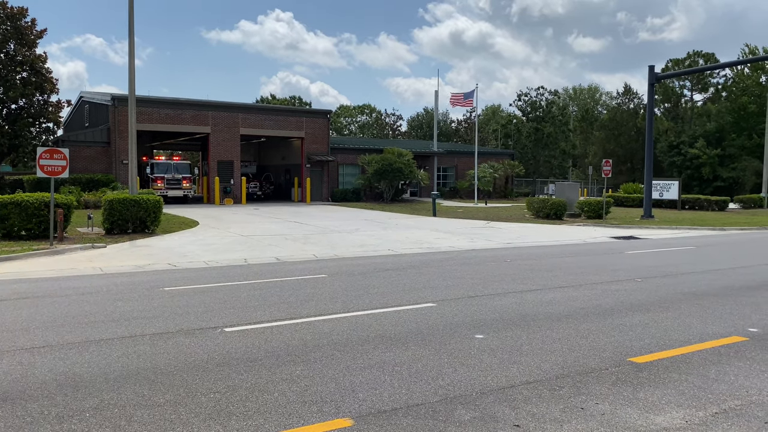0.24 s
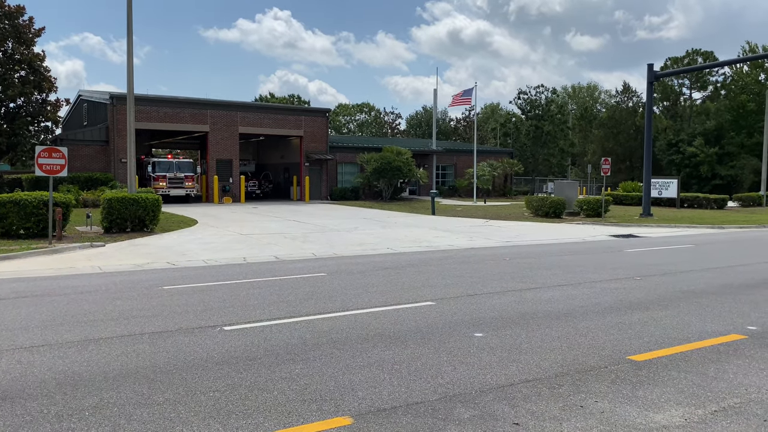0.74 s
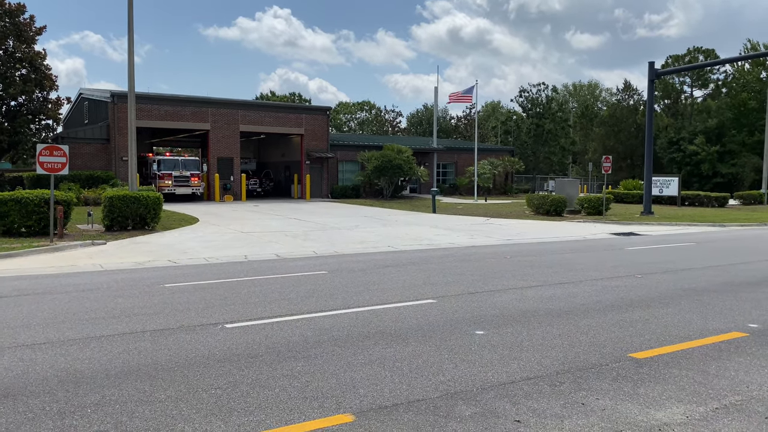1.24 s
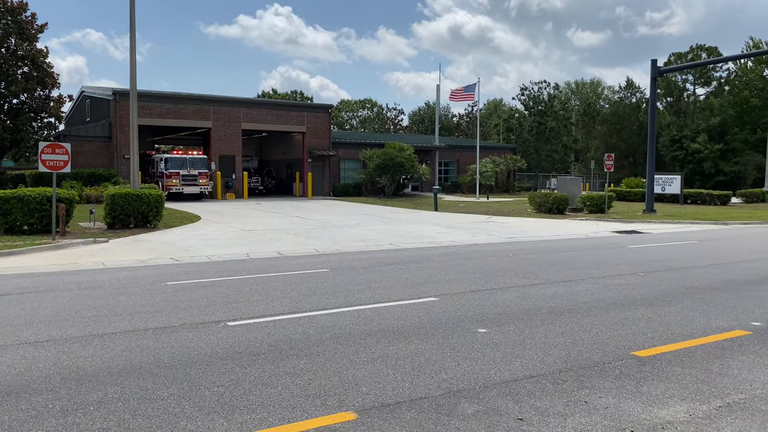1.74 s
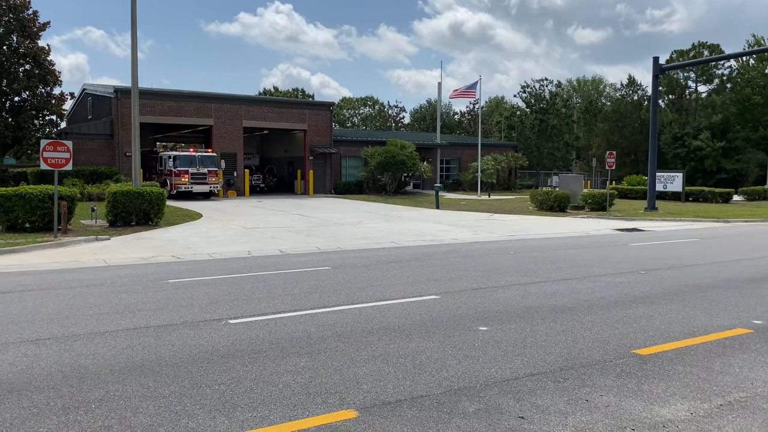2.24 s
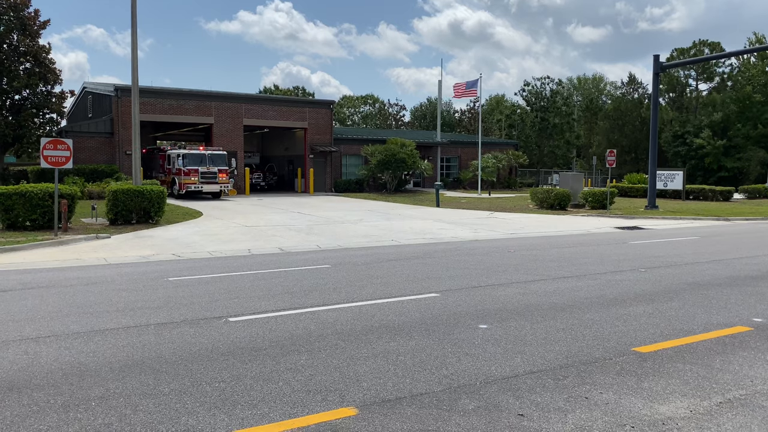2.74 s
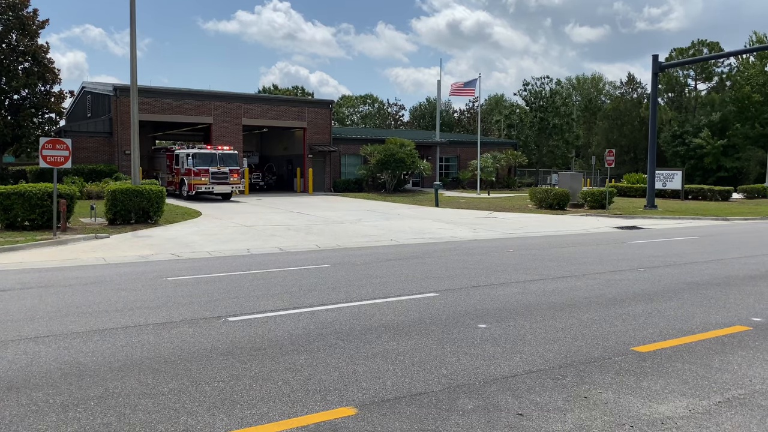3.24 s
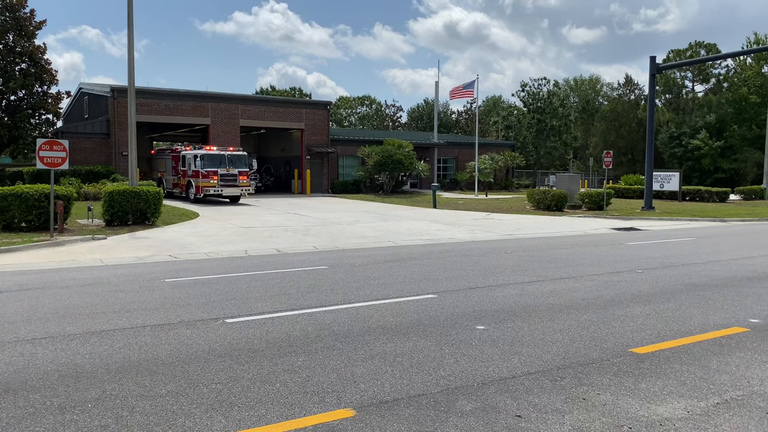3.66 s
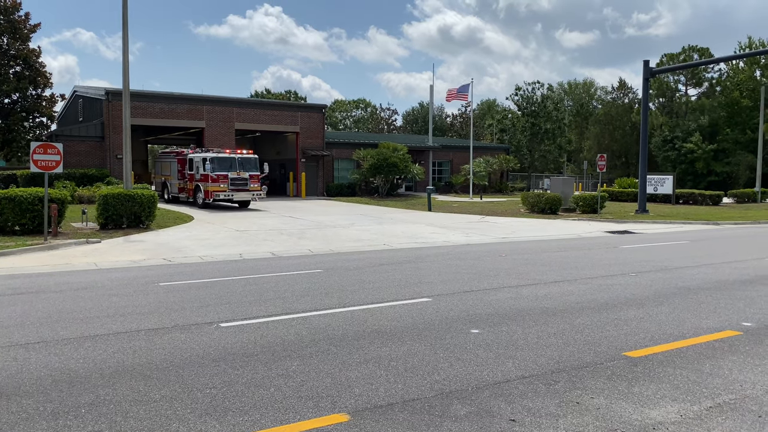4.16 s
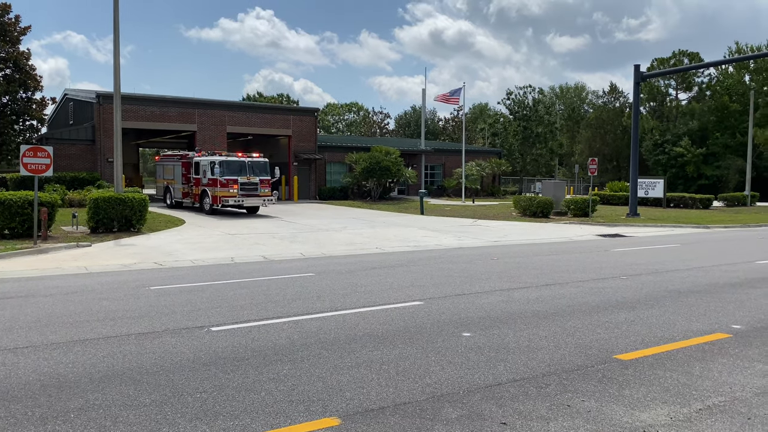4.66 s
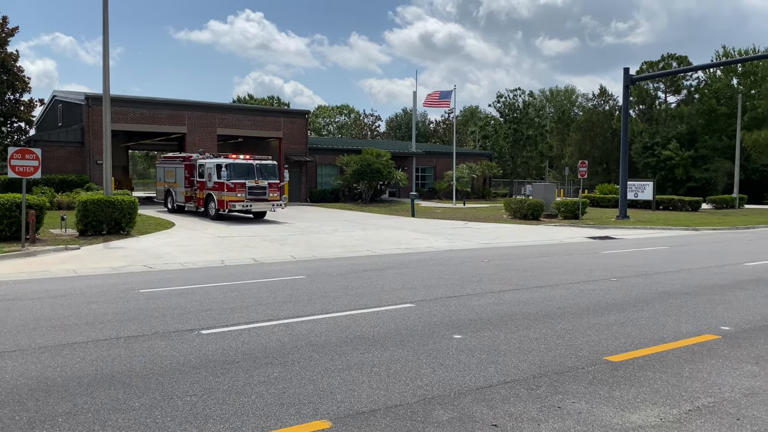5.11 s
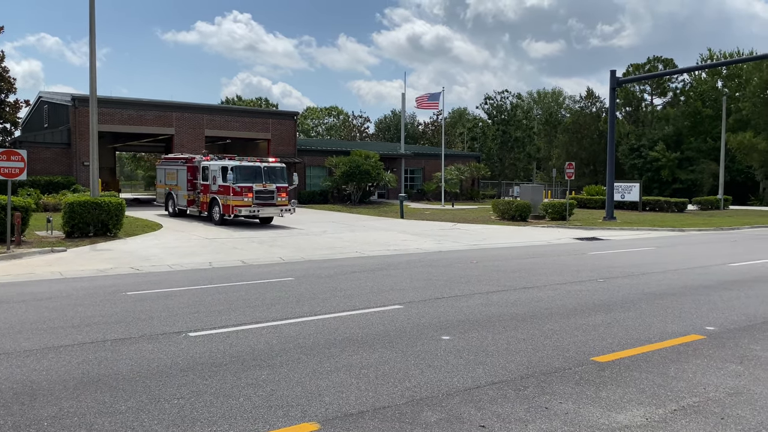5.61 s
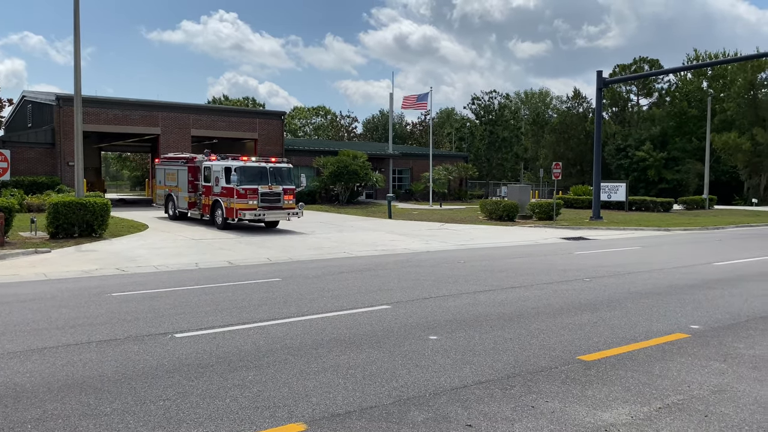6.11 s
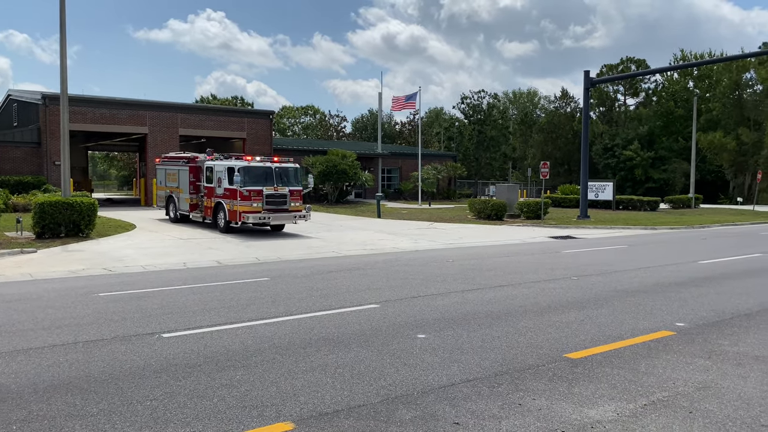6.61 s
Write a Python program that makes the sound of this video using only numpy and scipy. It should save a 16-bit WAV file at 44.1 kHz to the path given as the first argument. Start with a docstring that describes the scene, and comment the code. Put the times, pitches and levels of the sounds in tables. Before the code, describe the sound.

Across a wide road, a heavy truck's idle swells into a clattering roar with gearbox whine, drops back, and ends in brake squeaks and an air blast.

```python
"""A diesel fire engine rolls out of its station, heard from across a wide road in a light breeze.
It idles with a singing turbocharger, then revs up over a climbing gearbox whine and the whistle thins out.
Pulling past the doorway it clatters and booms: pulses and puffs of firing, blurred by the bay's echoes.
The pedal lifts, the revs drop and the turbocharger runs down. At the end the brakes squeal in gliding
tones and compressed air, a shaped noise, hisses out. Rumble and distant traffic lie under it all."""
import sys
import numpy as np
from scipy import signal
from scipy.fft import rfft, irfft
from scipy.io import wavfile

SR = 44100
rng = np.random.default_rng(int(sys.argv[2]) if len(sys.argv) > 2 else 0)


def transcribe(signal):
    """Save signal, clipped to [-1, 1], as a 16-bit WAV file at the path in sys.argv[1]."""
    frames = np.atleast_2d(signal).T
    limited = np.clip(frames, -1, 1)
    pcm = np.round(limited * 32767).astype(np.int16)
    wavfile.write(sys.argv[1], SR, pcm)


N = 303408
T = np.arange(N) / SR
FREQS = np.arange(N // 2 + 1) * SR / N

# engine speed as the rate of firings: time_s, firing_hz
REVS = [(.98, 37.7), (1.25, 58), (1.55, 75), (2, 78), (2.45, 82.5), (2.75, 86), (3, 82), (3.35, 72),
        (3.6, 74.5), (3.9, 77.3), (4.35, 78.3), (4.6, 77), (4.82, 68), (5.1, 45), (5.5, 39.3)]


def undb(db):
    """Decibels to gain."""
    return 10 ** (np.asarray(db) / 20)


def unit(x):
    """Scale to rms 1."""
    return x / np.sqrt(np.mean(x ** 2))


def curve(rows, axis=1):
    """One column of a timed table, joined by straight lines, for every sample."""
    rows = np.array(rows)
    return np.interp(T, rows[:, 0], rows[:, axis])


def across(points):
    """A table over frequency, joined on a log axis."""
    hz, value = np.transpose(points)
    return np.interp(np.log(FREQS + 1), np.log(hz), value)


def colour(x, points):
    """Filter by a spectrum of (Hz, dB); rms 1."""
    return unit(irfft(rfft(x) * undb(across(points)), N))


def noise():
    """White noise."""
    return rng.standard_normal(N)


def walk(rate):
    """Smooth random drift of spread 1, moving about rate times a second."""
    return unit(irfft(rfft(noise()) * np.exp(-(FREQS / rate) ** 2), N))


def echoes(x, t60):
    """Dense reflections that fall 60 dB in t60 seconds, at about the level of the sound itself."""
    tail = noise()[:SR] * np.exp(-np.log(1000) * T[:SR] / t60)
    return signal.fftconvolve(x, tail / np.sqrt(np.sum(tail ** 2)))[:N]


def envelope(start, attack, hold, release):
    """Rise from 0 to 1, hold, and fall back; all in seconds."""
    rise = (T - start) / attack
    fall = 1 - (T - start - attack - hold) / release
    return np.clip(np.minimum(rise, fall), 0, 1)


def bump(middle, half_length):
    """A smooth swell to 1 and back; both in seconds."""
    return np.exp(-((T - middle) / half_length) ** 2)


def whistle(hz, gain, waver, flutter_db=2):
    """A sine whose pitch wavers by a share of itself and whose level flutters."""
    phase = np.cumsum(hz * (1 + waver * walk(92.0))) / SR
    return np.sin(2 * np.pi * phase) * gain * undb(flutter_db * walk(57))


def add_echoes(tone, wet_db, t60):
    """Blur a tone with reflections without changing its overall level."""
    return unit(tone + undb(wet_db) * echoes(tone, t60)) * np.std(tone)


def effort():
    """Engine speed from 0 at its lowest to 1 under a full pull; it can pass 1."""
    pull_hz = 78  # firing rate under a full pull
    hz = curve(REVS)
    return (hz - hz.min()) / (pull_hz - hz.min())


def doorway():
    """From 0 to 1 and back as the engine passes the doorway, which alters its sound."""
    return bump(middle=2.48, half_length=0.55)


def drive(idle_db, revs_db, near_db, door_db, coast_db):
    """Gain of an engine part: its idle level, changed by the revs, the approach, the doorway and coasting."""
    roll_s = 0.5  # the truck starts to roll nearer
    near = np.clip((T - roll_s) / (T[-1] - roll_s), 0, 1)
    # the pedal lifts: fuel fades, stays off, returns for idle
    coast = envelope(start=4.437, attack=0.38, hold=0.13, release=0.69)
    return undb(idle_db + revs_db * effort() + near_db * near + door_db * doorway() + coast_db * coast)


def road(level_db=-42, swell_db=2.9):
    """Distant traffic: coloured noise that swells slowly."""
    # spectrum of the traffic: freq_hz, level_db
    road_colour = [(30, -1), (110, 7), (300, 3.5), (500, -19), (1200, -15), (2400, -18.5), (3300, -58),
                   (7000, -46), (9000, -48), (12000, -47), (15000, -49)]
    return colour(noise(), road_colour) * undb(level_db + swell_db * walk(0.67))


def rumble(start_db=-32.0, fade_db_per_s=0.24, swell_db=1.2, buffet_hz=64, churn_db=-6):
    """Deep noise of truck and breeze eases slowly, with brief buffets of unsteady low tone and noise."""
    # low buffets: middle_s, level_db (of the tone), half_length_s
    buffets = [(0.084, -19.5, 0.018), (0.353, -27.5, 0.024), (1.097, -27, 0.048), (1.208, -25, 0.03),
               (1.53, -33, 0.2), (3.295, -15.5, 0.014), (3.493, -28.5, 0.067), (4.862, -36, 0.042)]
    # spectrum of the deep bed: freq_hz, level_db
    rumble_colour = [(15, -34), (30, -56), (45, -4.5), (62, 0.5), (90, -0.5), (130, -4.5), (250, -23.5),
                     (2000, -100)]
    # spectrum of the noise in a buffet: freq_hz, level_db
    buffet_colour = [(30, -32), (80, 2), (150, -0.5), (280, -7), (500, -41), (2000, -90)]
    bed = colour(noise(), rumble_colour) * undb(start_db - fade_db_per_s * T + swell_db * walk(5.5))
    swell = sum(undb(db) * bump(s, half_length) for s, db, half_length in buffets)
    eddy_hz = buffet_hz * (1 + 0.351 * walk(43.5))
    eddy = np.sin(2 * np.pi * np.cumsum(eddy_hz) / SR)
    churn = undb(churn_db) * colour(noise(), buffet_colour)
    return bed + swell * (unit(eddy) + churn)


def rattles(chatter_db=3, attack_s=0.013, decay_s=0.042):
    """Loose gear chatters briefly against the body: flickering noise that starts fast and dies away."""
    # bursts of rattle: start_s, level_db
    rattle_times = [(3.705, -38), (3.97, -38), (4.535, -39.5), (5.702, -54), (5.945, -42.5)]
    # spectrum of the rattle: freq_hz, level_db
    rattle_colour = [(600, -30), (1200, -20), (1400, -1), (1580, -9), (1920, 2), (2200, -4), (2600, -16),
                     (3000, -20), (7000, -36), (12000, -45)]
    shake = 0
    for s, db in rattle_times:
        rise = np.clip((T - s) / attack_s, 0, 1)
        decay = np.exp(-np.maximum(T - s - attack_s, 0) / decay_s)
        shake = shake + undb(db) * rise * decay
    return colour(noise() * undb(chatter_db * walk(120)), rattle_colour) * shake


def whine(start_s=1.72, glide_s=.6, from_hz=10300, to_hz=12300, level_db=-71):
    """A thin whine climbs as the truck moves off and fades into the rush of air."""
    hz = np.interp(T, [start_s, start_s + glide_s], [from_hz, to_hz])
    gain = undb(level_db) * envelope(start_s, attack=.06, hold=0.41, release=.35)
    return whistle(hz, gain, waver=.005)


def intake(flutter_db=1.05, bay_db=-60, bay_revs_db=2, spit_db=-63):
    """Air rushes as noise through intake and radiator fan, with the bay's own hiss until the truck is clear."""
    # spectrum of the rush: freq_hz, level_db
    intake_colour = [(1500, -42), (2800, 12), (4100, 6.5), (4700, -1), (5200, 3.5), (5900, 3), (7300, 3),
                     (8400, -1.5), (11800, -4), (13000, -8), (15500, -17)]
    # spectrum of the hiss in the bay: freq_hz, level_db
    bay_hiss = [(3000, -4), (4300, -7.5), (4700, -8), (5150, -5.5), (5550, -6), (5850, -8), (6400, -1),
                (7200, 1.5), (7750, -2), (8250, -28), (9500, -28), (11500, -14), (13000, -30)]
    # spectrum of a thin spit of air: freq_hz, level_db
    spit_colour = [(7000, -30), (10000, -6), (11800, 0), (13500, -20)]
    gain = drive(idle_db=-60.5, revs_db=3.0, near_db=4.0, door_db=2.5, coast_db=-7.5)
    rush = colour(noise(), intake_colour) * gain
    clear_s, fade_s = 2.98, 0.28
    inside = np.clip(1 - (T - clear_s) / fade_s, 0, 1)
    bay = colour(noise(), bay_hiss) * undb(bay_db + bay_revs_db * effort()) * inside
    spit_gain = undb(spit_db) * envelope(start=3.04, attack=0.036, hold=0.097, release=.04)
    spit = colour(noise(), spit_colour) * spit_gain
    return (rush + bay + spit) * undb(flutter_db * walk(24))


def turbo(swell_db=3):
    """The turbocharger sings at idle, thins out as it spins up, and runs down slowly after the pedal lifts."""
    # blade tone: time_s, pitch_hz, level_db
    blade_tone = [(0, 6420, -59.5), (1.04, 6440, -62), (1.16, 7050, -64), (1.3, 7900, -84),
                  (4.45, 8800, -84), (4.65, 8620, -75), (5.1, 8150, -74), (5.35, 7650, -70),
                  (5.52, 7430, -73), (5.7, 7170, -62), (5.9, 7000, -69), (6.1, 6850, -67), (6.5, 6600, -71),
                  (6.88, 6500, -73)]
    gain = undb(curve(blade_tone, axis=2) + swell_db * walk(14))
    tone = whistle(curve(blade_tone), gain, waver=0.004)
    return add_echoes(tone, wet_db=-5, t60=0.39)


def gears(trim_db=-2):
    """The gearbox whine climbs as the truck pulls and falls as the pedal lifts; a lower one sinks as it coasts."""
    # gearbox whine: time_s, pitch_hz, level_db (before the trim)
    gear_whine = [(1, 630, -60), (1.35, 715, -46), (1.52, 775, -44), (1.68, 805, -42), (2, 780, -54),
                  (2.9, 790, -52), (3.2, 782, -43), (3.4, 755, -51), (3.57, 780, -43), (4, 800, -48),
                  (4.4, 822, -43), (4.58, 755, -44), (4.76, 705, -40), (4.95, 665, -58)]
    # low whine while coasting: time_s, pitch_hz, level_db (before the trim)
    coast_whine = [(4.7, 535, -80), (5.1, 520, -48), (5.55, 505, -52), (5.85, 490, -46), (6.2, 478, -54),
                   (6.88, 425, -57)]
    tone = 0
    for rows in (gear_whine, coast_whine):
        tone = tone + whistle(curve(rows), undb(curve(rows, axis=2) + trim_db), waver=0.007)
    return add_echoes(tone, wet_db=-1, t60=0.86)


def brakes(attack_s=.012, release_s=.025, grit=.25, wet_db=-8):
    """The brakes squeal in short gliding tones; stick-slip makes their level flicker by a share, grit."""
    # squeals: start_s, length_s (before the release), first_hz, last_hz, level_db, waver_share
    squeals = [(6.25, .08, 12500, 13000, -55, .009), (6.357, .14, 8600, 8730, -46, .003),
               (6.36, .035, 13250, 13050, -45, .009), (6.386, .047, 7990, 8090, -28.5, .002),
               (6.445, .05, 12750, 12700, -43, .009), (6.448, .025, 13250, 13100, -47, .009),
               (6.489, .125, 8730, 8870, -39, .005), (6.507, .03, 7440, 7350, -47, .004),
               (6.615, .065, 8830, 8600, -34.5, .007), (6.68, .035, 8330, 8230, -37, .005),
               (6.76, .033, 12550, 12350, -42, .006)]
    squeal = 0
    for s, length, first_hz, last_hz, db, waver in squeals:
        hz = np.interp(T, [s, s + length], [first_hz, last_hz])
        grip = envelope(s, attack_s, length - attack_s, release_s)
        squeal = squeal + whistle(hz, undb(db) * grip, waver)
    squeal = squeal * (1 + grit * walk(220))
    return squeal + undb(wet_db) * echoes(squeal, t60=0.23)


def air_valve(attack_s=0.13, release_s=0.31):
    """A valve lets compressed air out as noise: two faint breaths, then the loud hiss at the end."""
    # blows: start_s, hold_s, level_db
    air_blows = [(2.93, .02, -67), (5.47, .02, -68), (6.557, 0.057, -37.5)]
    # spectrum of the hiss: freq_hz, level_db
    air_colour = [(2100, -7), (2430, 19), (2700, 17.5), (2950, -2), (3600, -1.5), (6000, -2), (8500, 3.5),
                  (10500, 4), (12500, 5), (15500, 5.5)]
    flow = sum(undb(db) * envelope(s, attack_s, hold, release_s) ** 2 for s, hold, db in air_blows)
    return colour(noise(), air_colour) * flow


def drone(waver=.017, swell_db=3, fade_db_per_s=.9, rise_db_per_s=2.6):
    """The even part of the firings hums in wandering low tones, and the exhaust booms at its resonances."""
    # hum: multiple of the firing rate, idle_db and full_revs_db (both before the drift over time)
    hum_tones = [(3, -38, -51), (10 / 3, -37, -70), (4, -44, -56), (5, -40, -75)]
    # booms as the exhaust sweeps through resonances: middle_s, pitch_hz, level_db, half_length_s
    boom_times = [(1.1, 128, -31, .12), (1.62, 107, -31, .1), (1.78, 140, -32, .1),
                  (2.335, 133, -22.5, .06), (2.5, 138, -29, .1), (2.85, 151, -24.5, .07),
                  (3.3, 170, -30, .09), (3.48, 112, -31, .08), (3.82, 139, -27.5, .12), (4, 167, -30, .09),
                  (4.15, 133, -31, .1), (4.57, 135, -28.5, .11)]
    load = np.minimum(effort(), 1)
    turns = np.cumsum(curve(REVS) * (1 + waver * load * walk(16))) / SR
    # the bay reinforces the idle less as the truck leaves; the pull grows as it nears
    idling = (1 - load) ** 3 * undb(-fade_db_per_s * T)
    pulling = load ** 2 * undb(rise_db_per_s * T)
    hum = 0
    for multiple, idle_db, full_db in hum_tones:
        gain = undb(idle_db) * idling + undb(full_db) * pulling
        hum = hum + unit(np.sin(2 * np.pi * multiple * turns)) * gain * undb(swell_db * walk(4.6))
    booms = 0
    for s, hz, db, half_length in boom_times:
        tone = unit(np.sin(2 * np.pi * hz * T + 0.35 * walk(16)))
        booms = booms + tone * undb(db) * bump(s, half_length)
    return hum + booms


def engine(wobble=.006, scatter_db=3.0, puff=0.68, knock=0.15, gas_db=7, knock_floor=0.98, ring_floor=0.21):
    """Six cylinders fire in turn: each sends a pulse and a puff down the exhaust and rattles the block."""
    # spectrum of the exhaust: freq_hz, level_db
    exhaust_colour = [(20, -56), (50, -75), (90, -8.5), (134, 2.5), (172, -4.5), (200, -10.5), (240, -11.5),
                      (280, -12), (325, -11), (380, -20), (480, -38.5), (900, -34), (4000, -100)]
    # exhaust at idle against full load: freq_hz, change_db
    idle_tone = [(120, 2.5), (195, 1.5), (240, 2), (320, 5), (420, -2), (900, -14)]
    # spectrum of the block's clatter: freq_hz, level_db
    clatter_colour = [(200, 5.5), (400, 0), (600, 1.5), (760, 1.5), (920, -4.5), (1350, -2.5), (1560, -11),
                      (1780, -3), (1900, -0.5), (2000, -4), (2150, -13), (2400, -6.5), (2700, -13),
                      (2930, -33.5), (4500, -31), (12000, -70)]
    # resonances of a body panel: freq_hz, level_db
    panel_colour = [(300, -20), (450, -5), (520, 13.5), (600, -15), (800, -10), (890, 10.5), (1000, -4),
                    (1100, -1), (1330, 3), (1410, 16.5), (1480, 5.5), (1600, 2), (1980, 2), (2300, -4),
                    (8000, -58)]
    # bright ring of the block under a hard pull: freq_hz, level_db
    pull_colour = [(200, -22), (330, 1), (450, -8), (590, 5), (770, 2.5), (950, -9), (1550, -16), (1960, 8),
                   (2180, -10), (2650, -3.5), (2950, -32), (6000, -60)]
    # clatter ringing in the bay at the doorway: freq_hz, level_db
    door_colour = [(250, -18), (450, -0.5), (560, 2.5), (700, 0.5), (900, -13), (1250, -5), (1700, -32),
                   (5000, -60)]

    # puff and knock are decay times as shares of one firing
    hz = curve(REVS) * (1 + wobble * walk(6))
    turns = np.cumsum(hz) / SR
    firing, phase = turns.astype(int), turns % 1
    cylinder_db = np.array([-3.0, -4.5, -3.5, -6.5, -4.0, -7.5])
    size = undb(cylinder_db[firing % len(cylinder_db)] + scatter_db * noise()[firing])

    pulses = np.diff(firing, prepend=0) * size / np.sqrt(hz)
    gas = noise() * size * np.exp(-phase / puff)
    roar = gas + echoes(gas, t60=0.87)  # the bay blurs the puffs
    exhaust = colour(unit(pulses) + undb(gas_db) * unit(roar), exhaust_colour)
    # the exhaust is mellow at idle and opens up with the revs
    throttle = np.minimum(effort(), 1)
    exhaust = throttle * exhaust + (1 - throttle) * colour(exhaust, idle_tone)
    exhaust = exhaust * drive(idle_db=-40.0, revs_db=11, near_db=4.5, door_db=-0.5, coast_db=-2)

    # reflections fill the gaps between the knocks
    knocks = size * np.exp(-phase / knock)
    knocking = knock_floor + knocks
    block_gain = drive(idle_db=-46.5, revs_db=9.0, near_db=9.5, door_db=-2.5, coast_db=-3)
    block = colour(noise() * knocking, clatter_colour) * block_gain
    # the truck turns its side to the road and a panel sings with the clatter, still growing at the end
    turned = envelope(start=4.24, attack=3.63, hold=T[-1], release=3.63)
    panel = colour(noise() * knocking, panel_colour) * undb(-40) * turned
    # clear of the bay and pulling hard, the block rings brightly
    pull = envelope(start=3.31, attack=0.42, hold=0.81, release=0.081)
    ring = colour(noise() * (ring_floor + knocks), pull_colour) * undb(-40.5) * pull
    # the bay rings with the clatter as the engine passes the doorway
    bay = colour(noise() * knocking, door_colour) * undb(-39.5) * doorway()
    return exhaust + block + panel + ring + bay


def ports(x):
    """Two microphone ports: the left hears first, and sound scattered by the forecourt reaches each differently."""
    # how far the left port leads: freq_hz, phase_rad
    port_phase = [(20, 0), (300, .25), (1300, .75), (2200, 1.7), (3000, 3.2), (3500, 4.7), (4400, 6.8),
                  (5400, 7), (5900, 11), (7500, 11.3), (8500, 11), (10500, 12.6), (13000, 15),
                  (15500, 18.8)]
    # left minus right: freq_hz, balance_db
    port_balance = [(100, 0), (300, -.3), (750, 1), (1300, -2), (2300, -4.5), (3300, 1), (5200, 6),
                    (7200, -2), (8400, 2), (12000, 0)]
    # scattered sound against direct: freq_hz, level_db
    port_spread = [(40, -10), (70, -12), (130, -21), (400, -17), (1500, -12), (3500, -4), (6500, -7),
                   (9000, -10)]
    direct = rfft(x)
    scattered = rfft(echoes(x, t60=.45)) * undb(across(port_spread))
    # each port takes half of the lead and of the balance
    lean = undb(across(port_balance) / 2) * np.exp(1j * across(port_phase) / 2)
    left = irfft((direct + scattered) * lean, N)
    right = irfft((direct - scattered) / lean, N)
    return np.array([left, right])


def scene():
    """The truck and its surroundings, at the two ports."""
    surroundings = road() + rumble()
    air = intake() + whine() + air_valve()
    machinery = turbo() + gears() + brakes() + rattles()
    return ports(surroundings + air + machinery + drone() + engine())


def record(dry, low_cut_hz=30, top_hz=15750):
    """The phone cuts the deepest bass and the top."""
    thinned = signal.sosfilt(signal.butter(4, low_cut_hz, "high", fs=SR, output="sos"), dry)
    return signal.sosfilt(signal.ellip(10, .2, 80, top_hz, fs=SR, output="sos"), thinned)


dry = scene()
out = record(dry)
transcribe(out)
```